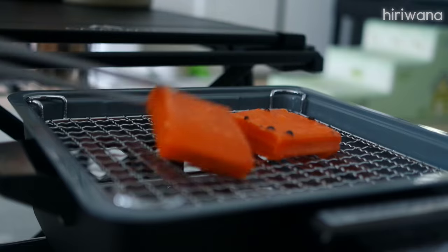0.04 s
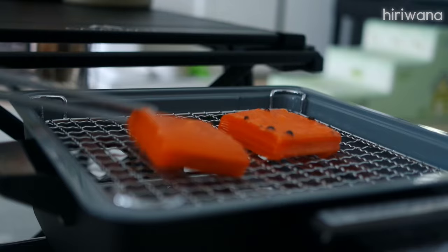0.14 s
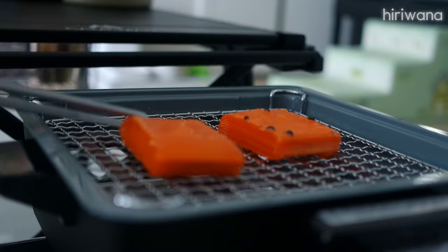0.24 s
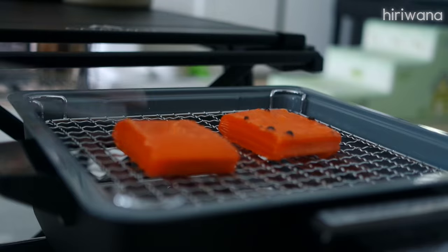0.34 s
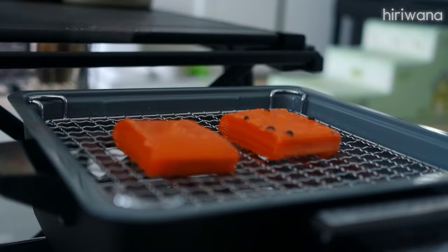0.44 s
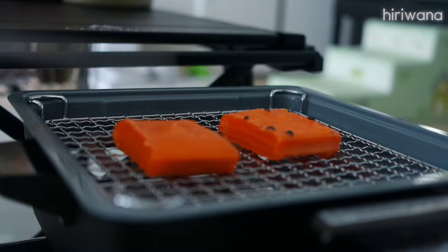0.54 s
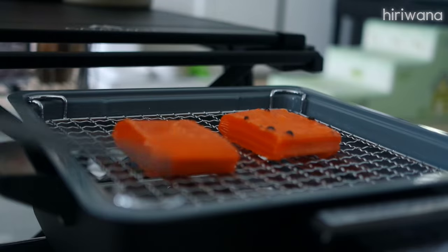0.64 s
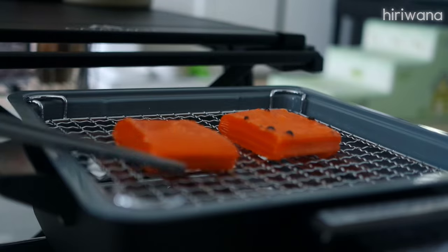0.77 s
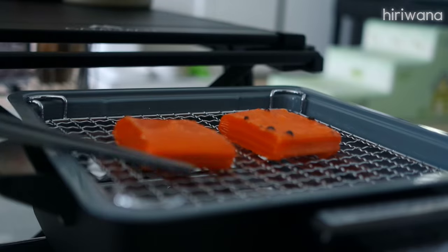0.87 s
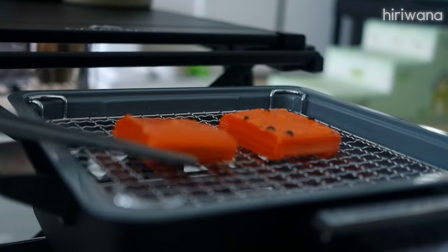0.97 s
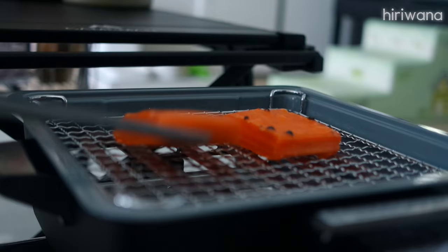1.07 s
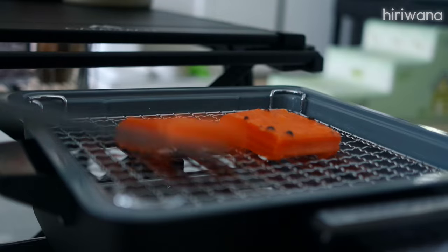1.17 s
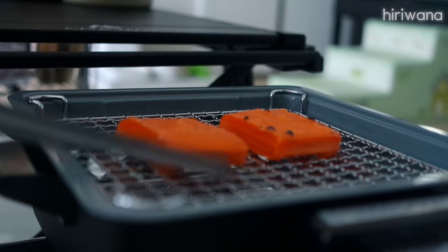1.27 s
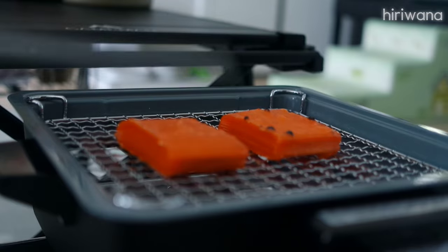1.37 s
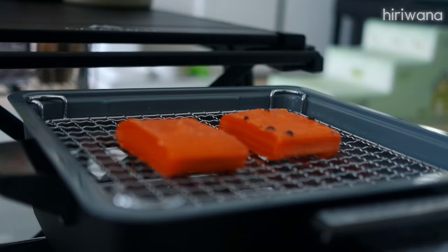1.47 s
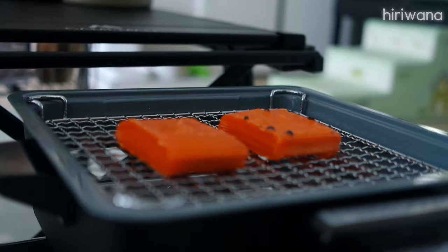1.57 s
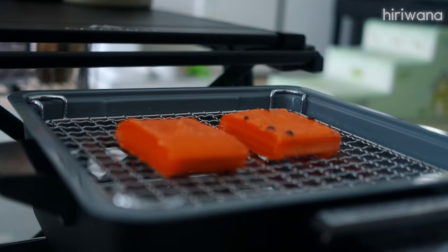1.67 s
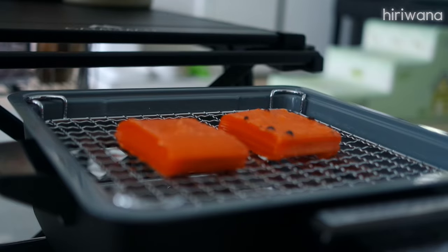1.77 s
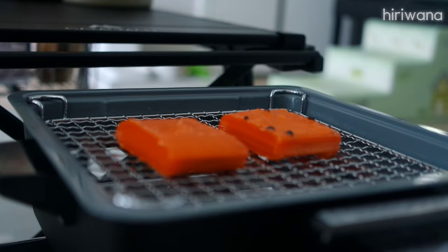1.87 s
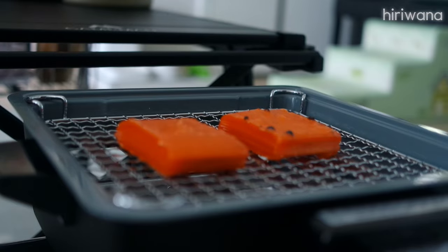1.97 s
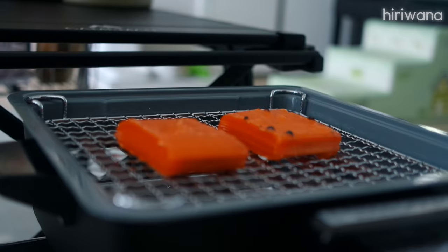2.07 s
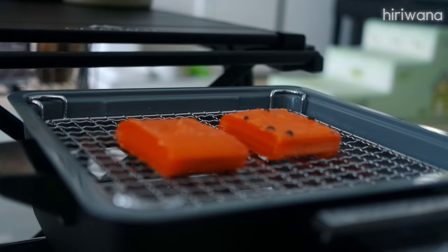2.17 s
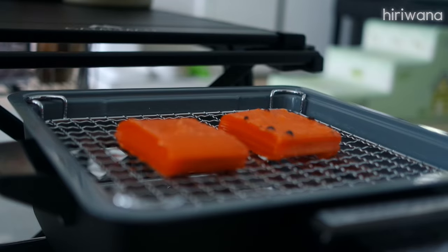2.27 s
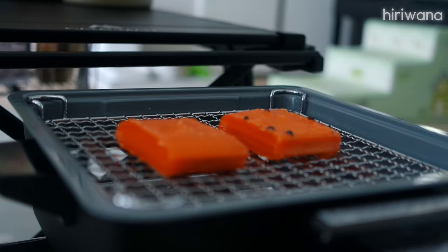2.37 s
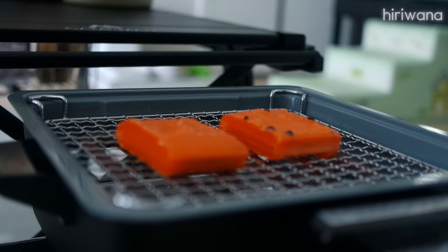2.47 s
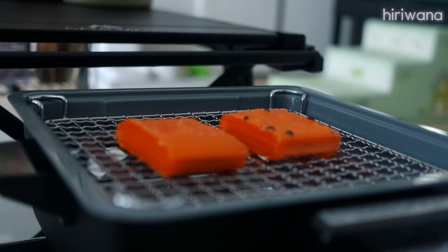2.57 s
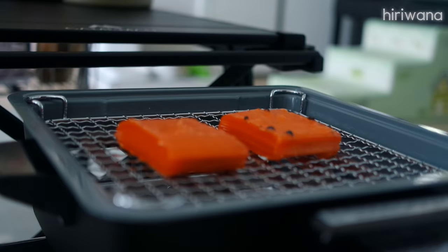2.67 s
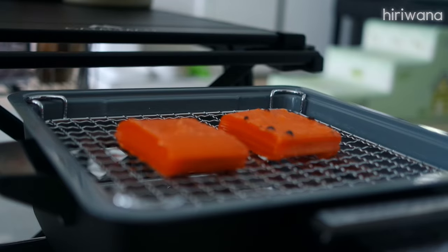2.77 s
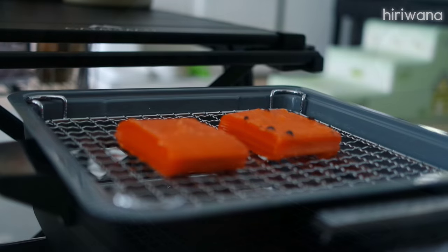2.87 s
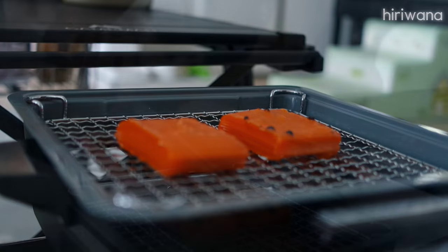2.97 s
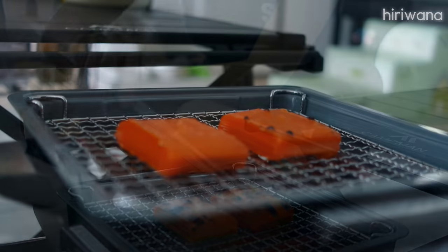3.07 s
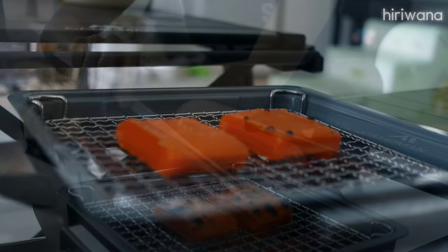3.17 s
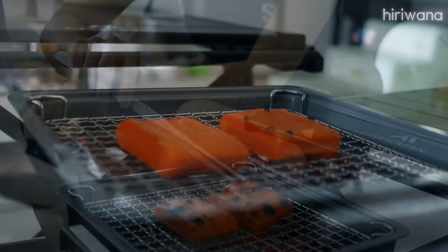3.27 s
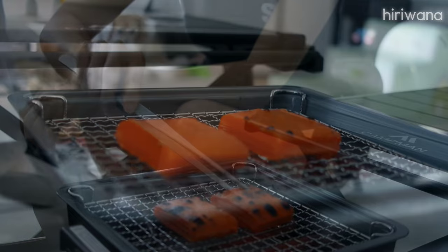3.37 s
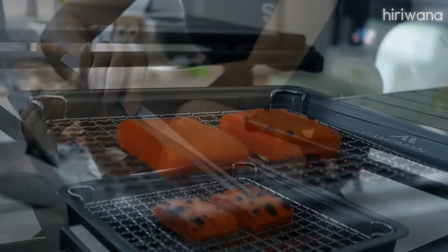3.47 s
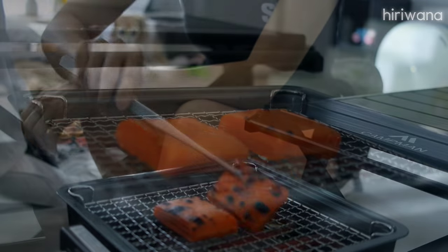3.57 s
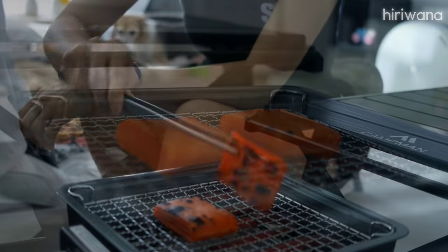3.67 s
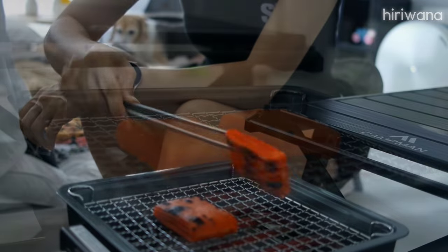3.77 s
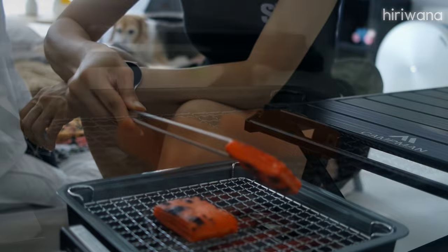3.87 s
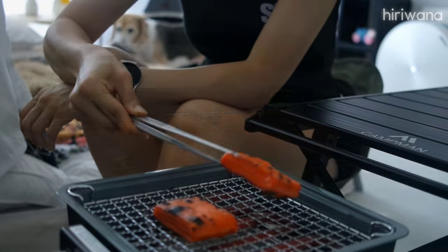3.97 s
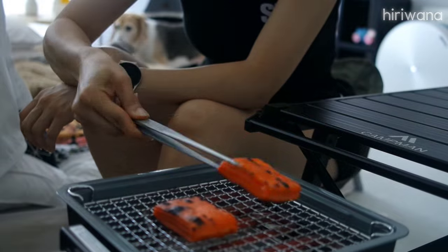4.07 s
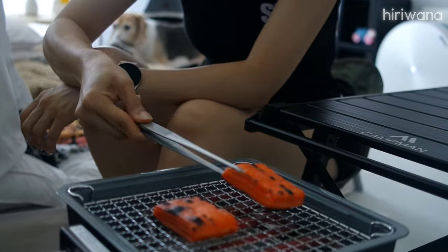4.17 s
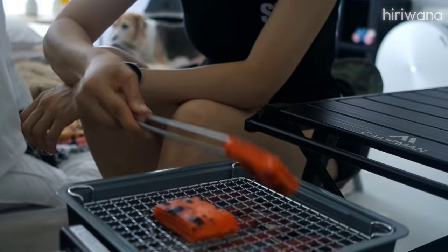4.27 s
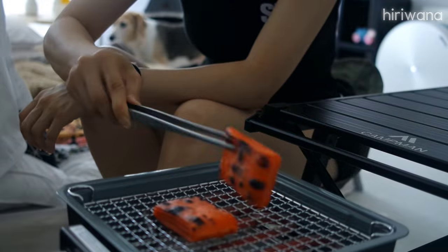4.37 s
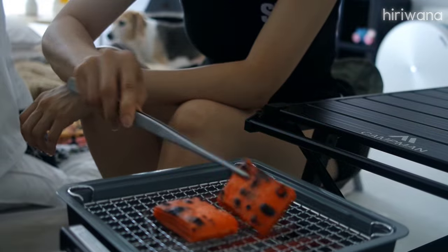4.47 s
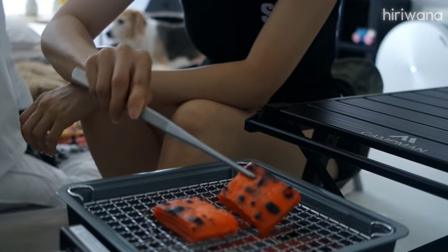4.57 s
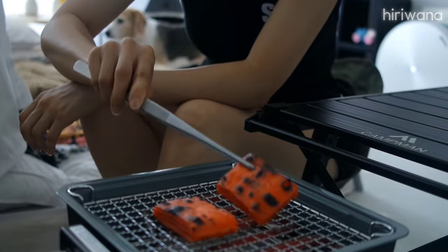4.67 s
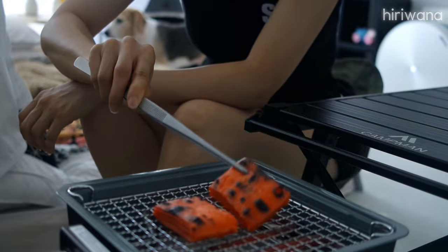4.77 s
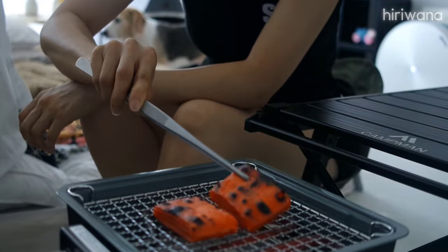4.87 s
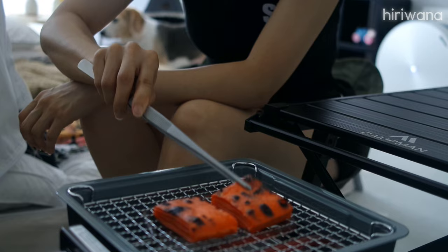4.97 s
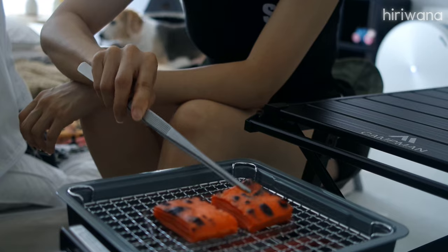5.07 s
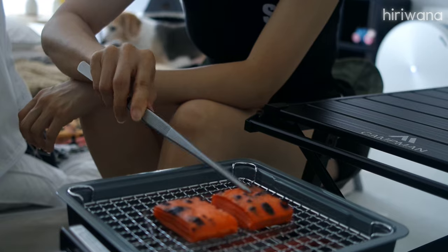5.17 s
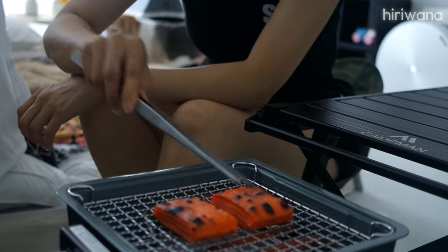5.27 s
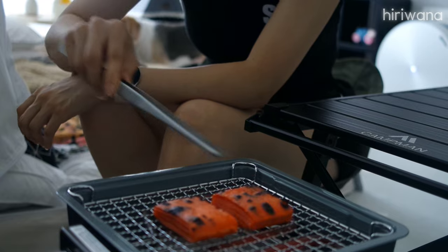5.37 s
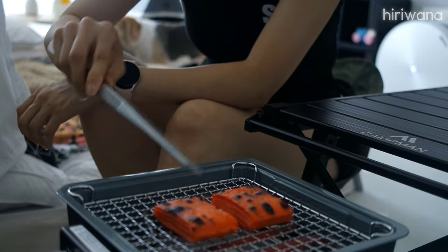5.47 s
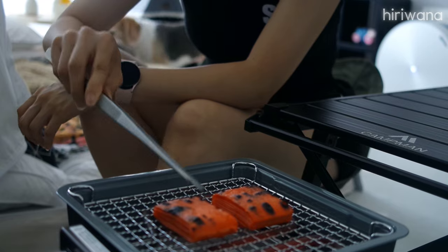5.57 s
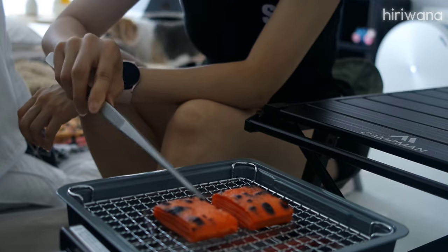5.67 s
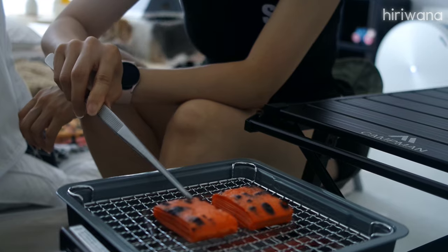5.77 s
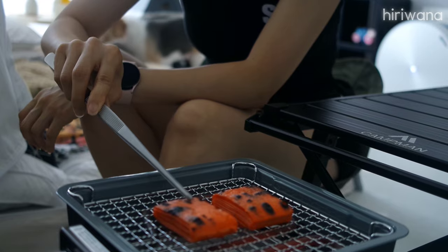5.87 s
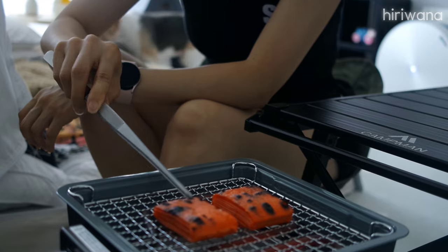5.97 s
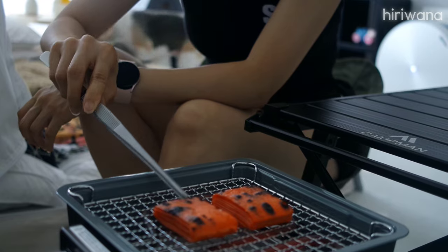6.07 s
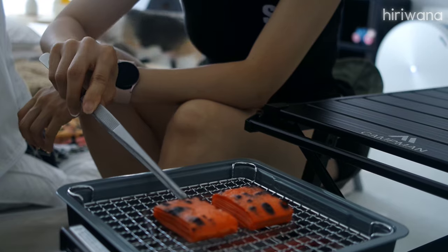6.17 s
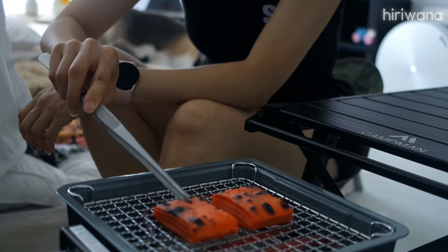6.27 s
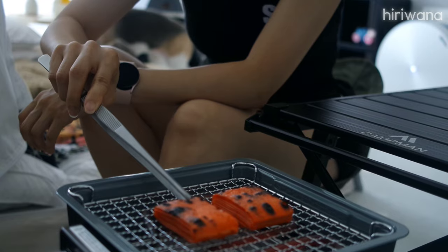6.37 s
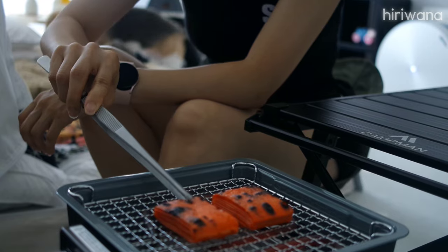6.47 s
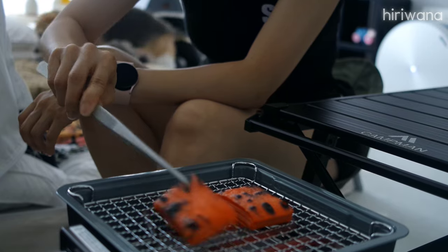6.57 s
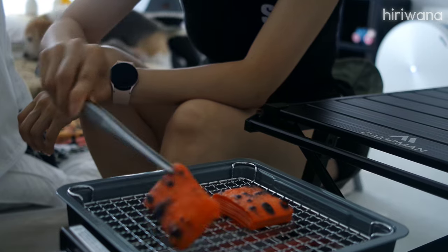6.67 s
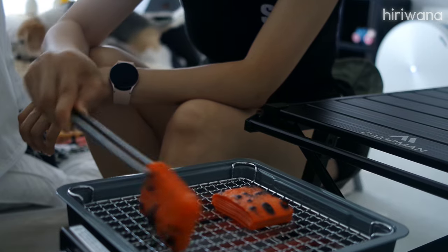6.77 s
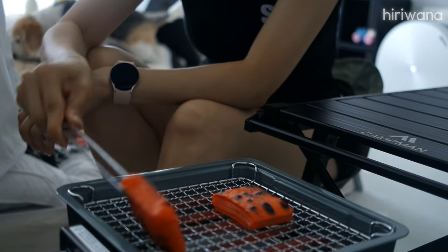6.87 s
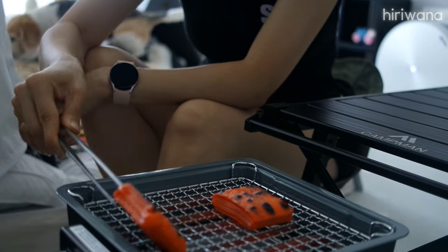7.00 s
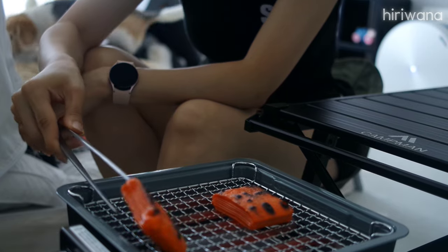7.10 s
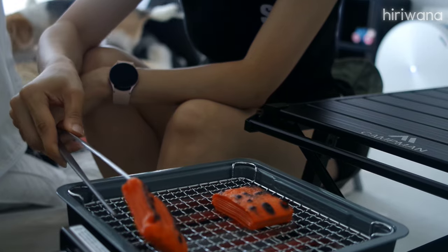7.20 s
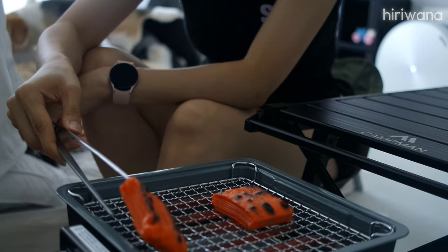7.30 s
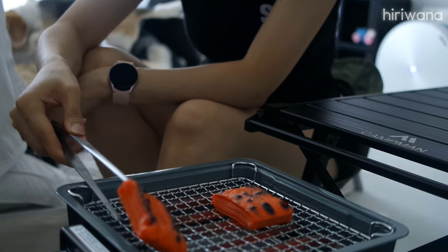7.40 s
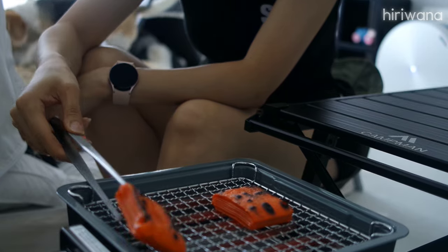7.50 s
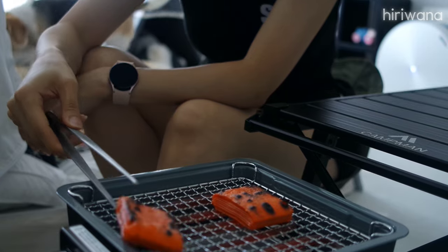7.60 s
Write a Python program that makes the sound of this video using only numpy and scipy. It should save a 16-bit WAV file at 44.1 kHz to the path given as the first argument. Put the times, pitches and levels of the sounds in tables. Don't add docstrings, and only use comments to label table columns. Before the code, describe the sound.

Dry, close sound of steel tongs handling food on a tabletop grill indoors. A hard clank comes early, followed by a crisp jaw snap, sparse tiny taps, a sharp double clack with ringing grate, then gentle scraping and high ticks from the tong tips. A final moderate clack ends it. Very low noise floor, gated rumble, thin faint whines, soft cloth rustles and far birds.

```python
import sys
import numpy as np
from scipy import signal
from scipy.fft import rfft, irfft, next_fast_len
from scipy.io import wavfile
from scipy.ndimage import map_coordinates

SR = 44100
rng = np.random.default_rng(int(sys.argv[2]) if len(sys.argv) > 2 else 0)


def unload_audio(sound):
    columns = np.transpose(np.atleast_2d(sound))
    steps = np.round(np.clip(columns, -1, 1) * 32767)
    wavfile.write(sys.argv[1], SR, steps.astype(np.int16))


def undo_db(level):
    steps = np.asarray(level, float) / 20
    return 10 ** steps


N = 336924
TIME_S = np.arange(N) / SR

# mode_hz, level_db, t60_s
TRAY = [(244, -7.5, 0.072), (354, 5, 0.031), (476, -1, 0.15), (606, -3, .4), (1020, -10, 0.018),
        (1325, 10, 0.12), (1480, 3, 0.1), (2105, -13, 0.048), (2465, 12, 0.085)]


def unit(x):
    return x / np.sqrt(np.mean(x ** 2) + 1e-20)


def along(points, hz):
    f, v = np.transpose(points)
    return np.interp(np.log(hz + 1), np.log(f + 1), v)


def wobble(rate_hz):
    knots = rng.standard_normal(int(N * rate_hz / SR) + 4)
    return map_coordinates(knots, [np.arange(N) * rate_hz / SR])


def noise(size, response):
    spectrum = rfft(rng.standard_normal(size))
    return unit(irfft(spectrum * response(np.fft.rfftfreq(size, 1 / SR) + 1), size))


def echo(x, wet_db):
    # frequency_hz, t60_s
    room = [(200, 0.72), (1500, 0.44), (5000, 0.42), (9000, 0.42), (14000, 0.28)]
    hz, t, z = signal.stft(rng.standard_normal(SR // 2), SR, nperseg=256)
    decay = undo_db(-60 * t / along(room, hz)[:, None])
    tail = signal.istft(z * decay, SR, nperseg=256)[1]
    return undo_db(wet_db) * signal.fftconvolve(x, tail / np.linalg.norm(tail))[:len(x)]


def ring(modes, t, t60_scale, rough, attack_s):
    hz, db, t60 = np.transpose(modes)[:, :, None]
    strength_db, phase = rng.standard_normal((2, len(hz), 1))
    knots = rng.standard_normal((len(hz), 200))
    knot_s = np.arange(200) * .003 / rough
    chatter = 1 + rough * np.array([np.interp(t, knot_s, row) for row in knots])
    envelope = undo_db(db + strength_db - 60 * t / (t60_scale * t60))
    y = np.sum(chatter * envelope * np.sin(2 * np.pi * hz * t + 3 * phase), 0)
    return y * (1 - np.exp(-t / attack_s)) / np.sqrt(np.sum(undo_db(2 * db)))


def strike(contacts, modes, t60_scale, rattle_hz, rattle_db, click_s, clatter_s, wet_db, broad,
           rise_s=0.00016, swell_s=0.00055, rough=0.49, order=2, size=16384, top_hz=3300, attack_s=.002):
    out, t = np.zeros(N + SR), np.arange(size) / SR
    for s, db, ring_db, hz, clatter_db in contacts:
        clatter = undo_db(-60 * t / clatter_s)
        fade = (undo_db(-60 * t / click_s) + undo_db(clatter_db) * clatter) * (1 - np.exp(-t / rise_s))
        click = fade * noise(size, lambda f: (broad + 1 / (1 + ((f - hz) / 1800) ** order))
                             / (1 + (3200 / f) ** 4))
        rattle = noise(size, lambda f: 1 / (1 + (rattle_hz / f) ** 4) / (1 + (f / top_hz) ** 4))
        rattle *= clatter * (1 - np.exp(-t / 0.003))
        body = ring(modes, t, t60_scale, rough, attack_s) + undo_db(rattle_db) * rattle
        hit = undo_db(db + 1.56) * click / np.max(np.abs(click))
        hit += undo_db(db + ring_db + 3.5) * body * (1 - np.exp(-t / swell_s))
        out[round(s * SR):][:size] += hit + echo(hit, wet_db)
    return out[:N]


def suppression():
    # start_s, level_db
    resting = [(0, -68), (.13, -64), (.68, -70.5), (1.9, -71), (2.85, -70), (3.4, -63.5), (3.9, -65),
               (4.15, -69.5), (4.4, -64), (4.62, -65), (4.9, -68.5), (5.5, -67), (5.88, -63.5), (6.08, -67),
               (6.2, -64.5), (6.6, -68.5), (7.0, -66), (7.64, -65.5)]
    # start_s, level_db, hold_s
    openings = [(0.786, -50.5, 0.29), (1.335, -51, 0.23), (3.055, -63, 0.033), (3.5, -50.5, 0.2),
                (4.156, -59, 0.045), (4.629, -56, 0.026), (5.066, -64, 0.11), (5.273, -63.5, 0.049),
                (5.42, -66, 0.058), (6.646, -54, 0.099), (7.619, -55, .1)]
    open_s, sag_db_per_s, close_db_per_s = .012, 11, 69.5
    level_db = np.interp(TIME_S, *np.transpose(resting))
    for s, db, hold in openings:
        since = TIME_S - s
        opened_db = db - sag_db_per_s * since - close_db_per_s * np.maximum(since - hold, 0)
        level_db = level_db + np.clip(since / open_s, 0, 1) * np.maximum(opened_db - level_db, 0)
    return level_db


def rumble():
    # frequency_hz, density_db (per Hz)
    spectrum = [(15, -8), (40, -5), (100, -2.5), (160, -11), (300, -9.5), (600, -14), (1500, -28),
                (2500, -59), (4000, -120)]
    # centre_hz, width_hz, level_db
    resonances = [(93, 3.1, 4), (193, 6.7, 3.5), (255, 18, 3.5), (328.1, 24, -1), (474, 13, 4),
                  (653, 28, 2.5)]

    def booms(f):
        return 1 + sum(undo_db(db - 3) / (1 + (2 * (f - c) / w) ** 2) for c, w, db in resonances)

    return noise(N, lambda f: undo_db(along(spectrum, f)) * booms(f))


def hiss(view):
    # frequency_hz, density_db (per Hz)
    colours = [
        [(470, -47), (800, -18), (916, -6), (1050, -15), (1460, -12), (3970, -12), (4270, -16), (7810, -20), (9520, -29.5), (15200, -15)],
        [(470, -51), (800, 1), (951, -6.5), (1590, -5.5), (1740, -8), (2090, -4), (2580, -9), (3140, -4), (3970, -7.5), (6500, -14.5), (12000, -18.5), (14100, -13), (15200, -17)],
    ]
    first, second = (noise(N, lambda f: undo_db(along(colour, f))) for colour in colours)
    mix = undo_db(-74.0) * np.sqrt(1 - view) * first + undo_db(-75.5) * np.sqrt(view) * second
    return undo_db(0.47 * wobble(14)) * mix


def whines(view):
    # pitch_hz, first_view_db, second_view_db
    tones = [(9362, -87, -99), (9728, -98, -99), (13695, -88, -110), (13857, -99, -89.5),
             (14420, -97, -103)]
    out = np.zeros(N)
    for hz, first_db, second_db in tones:
        level = (1 - view) * undo_db(first_db) + view * undo_db(second_db)
        out += undo_db(3 + wobble(7.3)) * level * np.sin(2 * np.pi * hz * TIME_S)
    return out


def background():
    rumble_db = suppression()
    opening_db = rumble_db + 68
    view = np.clip((TIME_S - 2.9) / 0.47, 0, 1)
    treble = noise(N, lambda f: 1 / (1 + ((f - 11500) / 4500) ** 4))
    out = undo_db(rumble_db) * rumble()
    out += undo_db(0.72 * opening_db) * hiss(view)
    out += undo_db(0.62 * opening_db) * whines(view)
    return out + undo_db(-87.0 + 0.71 * opening_db) * treble


def calls(rows, smear_hz, sag_per_s, swoop, steady=0):
    out = np.zeros(N + SR)
    for s, length, hz, db in rows:
        t = np.arange(round(length * SR)) / SR
        smear = noise(len(t), lambda f: 1 / (1 + (f / smear_hz) ** 2)
                      + 0.31 / (1 + (f / (5 * smear_hz)) ** 2))
        smear = unit(steady + smear)
        pitch_hz = hz * (1 + swoop * np.exp(-4 * t / length) - sag_per_s * t)
        tone = np.sin(2 * np.pi * np.cumsum(pitch_hz) / SR)
        out[round(s * SR):][:len(t)] += undo_db(db) * np.sin(np.pi * t / length) ** 0.22 * smear * tone
    return out[:N]


def birds():
    # start_s, length_s, pitch_hz, level_db
    warbles = [(0.005, .2, 3740, -86), (2.914, 0.19, 3860, -78), (2.077, 0.19, 3956, -80),
               (2.27, .3, 3710, -95), (3.25, 0.18, 2200, -78), (3.281, 0.14, 3210, -76.5),
               (4.37, .16, 3100, -92), (4.3, 0.62, 2073, -78), (4.904, 0.75, 2150, -81),
               (5.051, 0.028, 4250, -60), (5.08, 0.051, 4320, -79), (5.88, 0.33, 3920, -80),
               (6.13, 0.16, 3950, -75), (6.21, .12, 3380, -77), (6.398, 0.58, 3800, -76.5),
               (6.939, 0.22, 3880, -81), (7.275, 0.15, 3864, -77.5), (7.5, 0.097, 7100, -89)]
    whistles = [(2.776, .2, 7250, -85), (2.87, .1, 6550, -86), (3.05, .16, 7350, -84),
                (3.32, .08, 6800, -84), (4.655, .12, 3990, -77), (4.72, .09, 3720, -84),
                (5.33, .08, 3650, -74), (5.41, .12, 3650, -82), (5.42, .08, 4030, -84),
                (5.47, .1, 3250, -77), (5.55, .27, 3250, -81.5), (5.76, .1, 3650, -83),
                (5.78, .1, 4030, -81)]
    cheeps = [(3.0, 0.18, 4680, -82), (6.085, 0.075, 5183, -73), (6.178, 0.045, 5100, -69),
              (6.268, 0.053, 5220, -68.5), (6.1, 0.24, 5750, -79), (6.33, .14, 5250, -84)]
    song = calls(warbles, smear_hz=90, sag_per_s=0.077, swoop=0)
    song += calls(whistles, smear_hz=25.04, sag_per_s=0.001, swoop=-0.0095, steady=3.2)
    song += calls(cheeps, smear_hz=160, sag_per_s=.05, swoop=.12)
    return song + echo(song, -2.0)


def taps():
    # start_s, level_db, ring_db, click_hz, clatter_db
    contacts = [(0.097, -74.5, 7, 3300, -14), (0.3268, -61, -16, 5000, -18), (1.2, -62, -13, 3312, -22),
                (1.5994, -54.5, -12, 3600, -20), (1.7979, -59, -18, 4848, -4),
                (2.6562, -60, -16, 6650, -20), (2.8294, -63, -30, 4600, -15), (2.9184, -64, -10, 7240, -9),
                (3.3436, -53, -24, 7000, -28), (3.3863, -50, -31, 12100, -6), (3.425, -57, -16, 3200, -18),
                (4.025, -60, -24.5, 4740, -20), (4.5183, -60.5, -33, 5530, -17.5),
                (5.765, -65, -12, 3170, -23), (5.863, -63, -10, 3100, -20), (5.1535, -62, -30, 12000, -25),
                (5.9165, -52.5, -15.5, 6300, -30), (6.065, -62, -19, 3200, -20.5),
                (6.309, -66, -7, 2500, -25), (6.3642, -57, -12, 3860, -23), (6.7725, -55, -28, 13000, -14),
                (6.785, -50, -27, 13000, -12), (6.8155, -57, -30, 8000, -19.5),
                (6.826, -54, -27, 10000, -17), (6.848, -64, -30, 12500, -20),
                (6.9452, -58, -16, 13900, -20), (7.3663, -55.5, -15.5, 12700, -24.5)]
    return strike(contacts, TRAY, broad=0.25, t60_scale=0.16, rattle_hz=1980, rattle_db=4.0,
                  click_s=0.012, clatter_s=0.062, wet_db=-8, size=8192)


def hinge_flicks():
    # start_s, level_db, ring_db, click_hz, clatter_db
    contacts = [(0.1475, -70, 0, 13000, -20), (0.158, -57, 8, 12800, -20), (0.1785, -72, 5, 8300, -20),
                (0.197, -59, 3, 12900, -20), (0.4384, -54, -1, 13370, -26)]
    # mode_hz, level_db, t60_s
    hinge = [(6900, -18, 0.018), (8500, 5, 0.018), (10200, -4, .02), (13000, 3, .02), (14800, -4, .02)]
    return strike(contacts, hinge, rough=0.33, broad=0.4, t60_scale=0.77, rattle_hz=1900,
                  rattle_db=-28, click_s=0.0054, clatter_s=0.054, wet_db=-6, size=8192)


def rustles():
    # centre_s, length_s, centre_hz, level_db
    puffs = [(0.212, 0.045, 12600, -72), (0.21, .04, 5300, -75), (0.37, 0.048, 13000, -76),
             (1.012, 0.1, 12600, -63.5), (1.145, 0.074, 12600, -69.5), (1.807, 0.057, 12500, -77),
             (1.969, 0.069, 12560, -81), (2.596, 0.065, 10940, -81), (2.755, 0.037, 12700, -78),
             (3.29, 0.072, 10600, -76), (7.075, .04, 11050, -80), (7.15, 0.037, 11000, -81),
             (7.57, 0.024, 10000, -76.5)]
    out = np.zeros(N + SR)
    for s, length, hz, db in puffs:
        size = 2 * round(length * SR)
        puff = np.hanning(size) * noise(size, lambda f: 1 / (1 + ((f - hz) / 2200) ** 4))
        out[round(s * SR) - size // 2:][:size] += undo_db(db) * puff
    return out[:N]


def slam():
    # start_s, level_db, ring_db, click_hz, clatter_db
    contacts = [
        (0.7942, -9, 0.5, 14040, -16),
        (0.8203, -23.5, -16, 13900, -14),
    ]
    # mode_hz, level_db, t60_s
    wires = [(334, -15.5, 0.068), (470, -12, 0.044), (860, 3.5, 0.045), (859, -10, .3), (968, -9.5, 0.14),
             (1092, -14, 0.11), (1275, -8, 0.21), (1500, -14, .22), (1660, -13.5, 0.23), (2034, -3, .1),
             (2069, 3, 0.048), (2158, 5.5, .06), (2290, -3.5, 0.085), (2200, -13.5, 0.22),
             (2500, -11.5, 0.096), (2604, -12.5, 0.24), (2696, -12.5, 0.22), (3000, -10, .14),
             (3520, -15, 0.16), (4320, -16.5, 0.086), (5380, -13, 0.042)]
    return strike(contacts, wires, rough=0.58, top_hz=3800, broad=0.9, t60_scale=0.74, rattle_hz=670,
                  rattle_db=-11.5, click_s=0.058, clatter_s=0.11, wet_db=-13.0)


def bounce():
    # start_s, level_db, ring_db, click_hz, clatter_db
    contacts = [(0.9467, -40.5, 14.8, 4920, -14), (0.992, -65, 26, 4940, -21), (1.006, -61, 25, 5011, -20)]
    # mode_hz, level_db, t60_s
    settling = [(2200, 9.5, 0.07), (854, 9, 0.2), (1445, -27.5, 0.18), (1650, -20.5, 0.033),
                (1860, 2, 0.14), (3100, -9.5, 0.23), (3810, -16, 0.088)]
    return strike(contacts, settling, broad=0.303, t60_scale=0.34, rattle_hz=902, rattle_db=-10.5,
                  click_s=0.017, clatter_s=0.0522, wet_db=-12.5)


def knock_clicks():
    # start_s, level_db, ring_db, click_hz, clatter_db
    contacts = [(1.3381, -24, -2, 12500, -18), (1.3392, -11, -1, 12600, -22), (1.3407, -15, -1, 12000, -18),
                (1.3483, -25, -3, 12000, -12), (1.3577, -15, -1, 12900, -26), (1.3598, -22, -1, 12300, -22),
                (1.3706, -18, -1, 12900, -26), (1.3724, -26, 0, 13000, -16)]
    # mode_hz, level_db, t60_s
    bright_modes = [(8600, -13, .012), (11000, -7, .015), (11750, -2, 0.019), (12400, -5.5, .015),
                    (13380, 0.5, 0.017), (13900, -5.5, .012)]
    return strike(contacts, bright_modes, rough=.6, attack_s=.0002, swell_s=0.00022, order=4, broad=0.15,
                  t60_scale=0.596, rattle_hz=3000, rattle_db=-34.5, click_s=.006, clatter_s=0.12, wet_db=-15)


def knock():
    # start_s, level_db, ring_db, click_hz, clatter_db
    contacts = [
        (1.3385, -29.5, 5, 7025, 1),
        (1.3545, -42.5, 11.3, 6000, -1),
    ]
    # mode_hz, level_db, t60_s
    frame = [(473, 1.5, 0.13), (663, -10, 0.3), (775, -4, 0.1), (1093, -9, 0.3), (1200, -4.5, .08),
             (1464, -10, 0.2124), (1534, -11, .2), (1913, -1.5, 0.21), (2503, -6, .19), (2660, -6.5, .09),
             (3480, -8.5, .13), (3600, -10.5, .12), (3950, -8.5, .14), (4450, -14, 0.1394)]
    return strike(contacts, frame, rough=0.506, swell_s=0.0051, top_hz=6800, broad=0.28, t60_scale=0.88,
                  rattle_hz=350, rattle_db=-5, click_s=.006, clatter_s=0.16, wet_db=-14.0)


def scrapes():
    # start_s, level_db, ring_db, click_hz, clatter_db
    contacts = [(3.0716, -60, 0.5, 7960, -19), (4.0435, -61, -25, 10500, -14),
                (4.1535, -51, -19, 11900, -14), (4.1617, -41, -19, 11900, -17),
                (4.287, -56, -20, 9700, -18), (4.6602, -46, -17, 5860, -23),
                (5.2717, -55.5, -5, 12500, -32), (5.285, -54, -23, 12000, -43),
                (5.4174, -57, -13, 8800, -6)]
    # mode_hz, level_db, t60_s
    steel = [(4250, -10, 0.064), (5860, -6, 0.068), (8100, 7, 0.17), (8700, -1, 0.065), (9850, -1, 0.17),
             (10300, 1, 0.049), (11000, 13, 0.098), (11640, 1, 0.044), (12600, 6, 0.19), (14300, 1, .06)]
    return strike(contacts, steel, rough=2.6, rise_s=0.0073, broad=0.54, t60_scale=0.21, rattle_hz=1050,
                  rattle_db=-9.0, click_s=0.016, clatter_s=0.16, wet_db=-7.0)


def drop():
    # start_s, level_db, ring_db, click_hz, clatter_db
    contacts = [(3.5071, -14.5, -23, 14200, -20), (3.5322, -14.5, -28, 13600, -34),
                (3.7324, -47, -17, 12900, -11), (7.6243, -30.5, -20.5, 12560, -1.5)]
    return strike(contacts, TRAY, broad=0.11, t60_scale=0.43, rattle_hz=292, rattle_db=-3.5,
                  click_s=0.013, clatter_s=0.11, wet_db=-7.0)


def corner_hop():
    # start_s, level_db, ring_db, click_hz, clatter_db
    contacts = [(3.5838, -35, 1, 7750, 2), (3.5975, -48, 3, 7750, -9)]
    # mode_hz, level_db, t60_s
    corner = [(441, -8, 0.21), (577, -5, 0.39), (1467, 7.5, 0.06), (1550, -11, 0.1), (2200, -2, .094),
              (2370, 5, 0.066), (2750, -1, .05), (3290, -8, 0.1)]
    return strike(contacts, corner, broad=0.13, t60_scale=0.7, rattle_hz=290, rattle_db=-6,
                  click_s=0.0095, clatter_s=0.092, wet_db=-8.5)


def edge_landing():
    # start_s, level_db, ring_db, click_hz, clatter_db
    contacts = [(3.6438, -32.5, -9.5, 10300, -5), (3.6945, -55.5, 1, 3000, -20)]
    # mode_hz, level_db, t60_s
    rim = [(660, -8, 0.37), (1940, -13, .13), (2470, -2, 0.12), (2670, -10, .2), (2830, 1, 0.067),
           (3300, -9, 0.2), (4020, -14, .1), (5730, -6, .05)]
    return strike(contacts, rim, broad=0.6, t60_scale=0.57, rattle_hz=400, rattle_db=-5.5,
                  click_s=0.0095, clatter_s=0.14, wet_db=-13.5)


def set_down():
    # start_s, level_db, ring_db, click_hz, clatter_db
    contacts = [(4.6342, -58, 11.2, 7950, 0), (4.6475, -57.5, 11, 7950, 0)]
    # mode_hz, level_db, t60_s
    laden = [(474, -1, 0.15), (900, -7, 0.21), (1310, -4, 0.093), (1486, -4, 0.073), (1600, -9, .08),
             (2080, -10, .1), (2400, -9, .08), (2900, -18, .1)]
    return strike(contacts, laden, rough=.35, broad=0.13, t60_scale=0.63, rattle_hz=400, rattle_db=-10,
                  click_s=0.0095, clatter_s=0.1, wet_db=-11.5)


def drags():
    # start_s, level_db, ring_db, click_hz, clatter_db
    contacts = [(5.0505, -51.5, -3, 4800, -4), (6.688, -43, -2.5, 9300, 5), (6.705, -53, 5, 9300, 0),
                (6.7186, -62, -9, 12700, -11), (6.745, -57, -3, 9500, -8)]
    # mode_hz, level_db, t60_s
    arms = [(3560, -3, 0.12), (4250, -2, 0.1), (4720, 0, .08), (5250, -2, .06), (5750, -4, 0.059),
            (9500, 3, 0.091), (10300, -3, .12), (12000, 1, .1), (12700, -6, .1)]
    return strike(contacts, arms, top_hz=5470, rough=1.92, rise_s=0.0038, swell_s=0.0053, broad=0.77,
                  t60_scale=0.58, rattle_hz=1050, rattle_db=-12.5, click_s=0.014, clatter_s=0.2, wet_db=-7.5)


def tip_pinches():
    # start_s, level_db, ring_db, click_hz, clatter_db
    contacts = [(6.1094, -53.5, 2, 12000, -13), (6.1265, -45.5, 8, 12300, -31),
                (6.1569, -48.5, 3, 12300, -29), (6.3086, -50, -14, 12460, -24),
                (6.5854, -50, -1, 12000, -21), (6.6184, -56, -6.5, 11800, -21),
                (6.6495, -49, -2, 12600, -20), (6.6544, -40.5, 12, 12530, -25),
                (6.6593, -33, 7, 12500, -35)]
    # mode_hz, level_db, t60_s
    tips = [(11106, 0, .05), (11690, -8, .04), (12680, -3, .05), (14400, -1, .05)]
    return strike(contacts, tips, rough=0.34, order=4, broad=0.35, t60_scale=0.23, rattle_hz=1920,
                  rattle_db=-38.5, click_s=0.0066, clatter_s=0.2, wet_db=-6.5, size=8192)


def scene():
    metal = taps() + hinge_flicks() + slam() + bounce() + knock_clicks() + knock() + scrapes() + drop()
    metal += corner_hop() + edge_landing() + set_down() + drags() + tip_pinches()
    return (metal + background() + birds() + rustles())[None]


def top_cut(x):
    return signal.sosfilt(signal.butter(12, 16400, fs=SR, output="sos"), x)


def record(dry):
    size = next_fast_len(N)
    edge_points = [(14950, 1.5), (15250, -32.5), (15800, -32.5), (16500, -61.5)]  # frequency_hz, gain_db
    edge = undo_db(along(edge_points, np.fft.rfftfreq(size, 1 / SR)))
    fold = irfft(np.log(edge), size) * np.where(np.arange(size) < size // 2, 2, 0)
    fold[0] /= 2
    edge = np.exp(rfft(fold))
    mix = irfft(rfft(dry, size) * edge, size)[:, :N]
    return top_cut(mix)


dry = scene()
out = record(dry)
unload_audio(out)
```